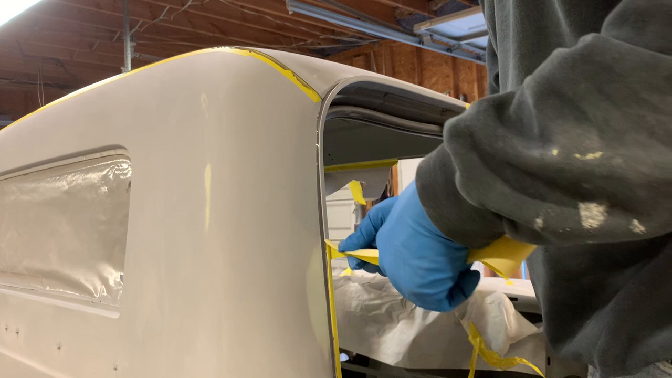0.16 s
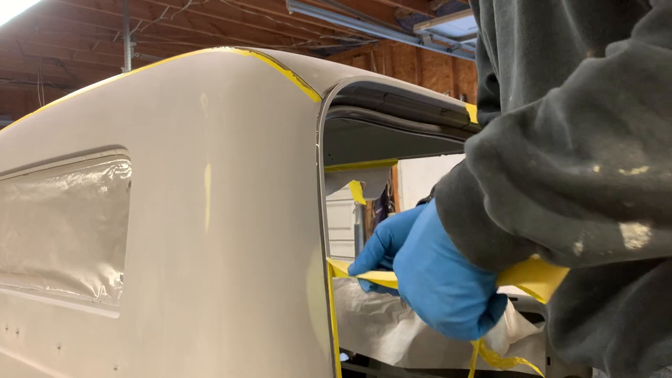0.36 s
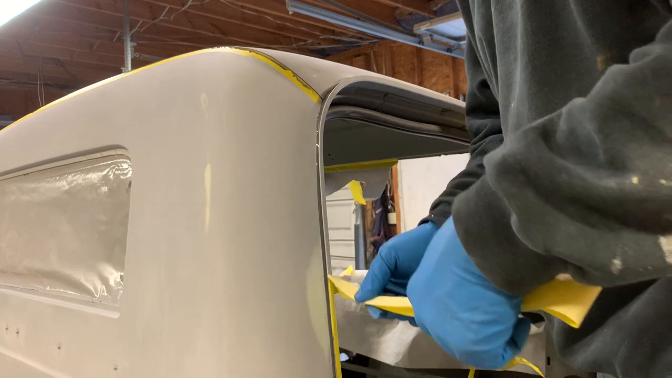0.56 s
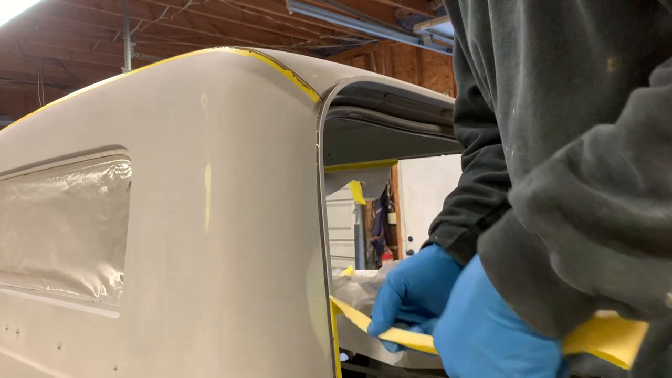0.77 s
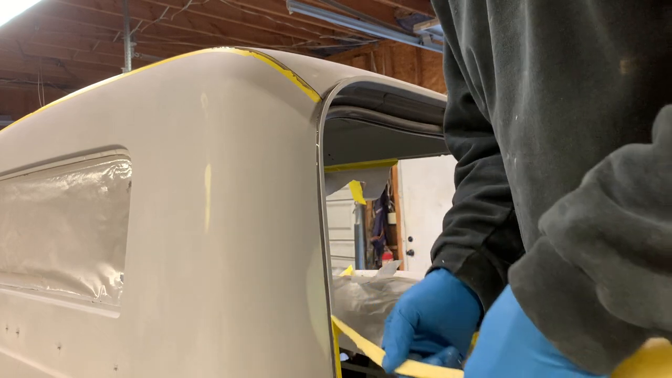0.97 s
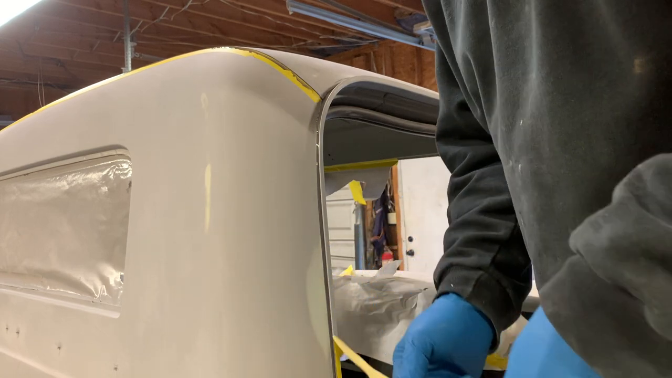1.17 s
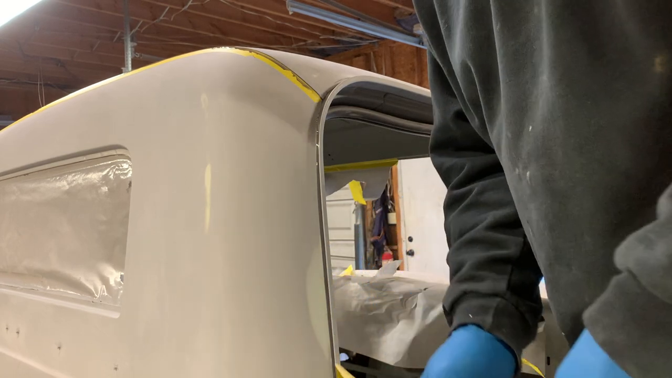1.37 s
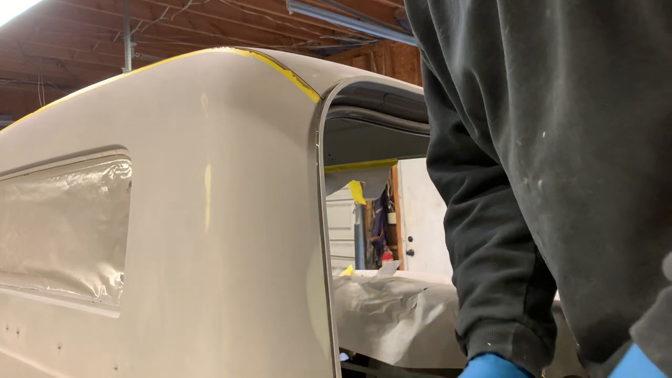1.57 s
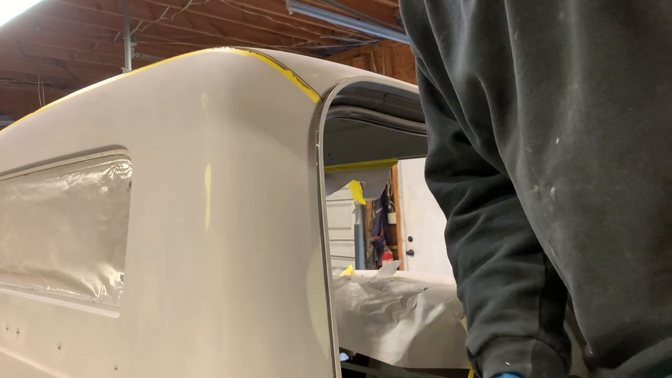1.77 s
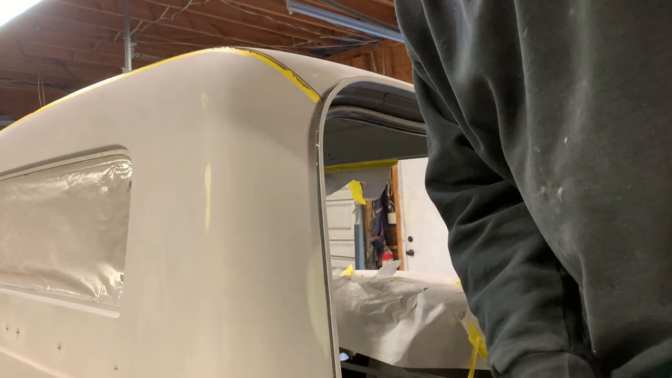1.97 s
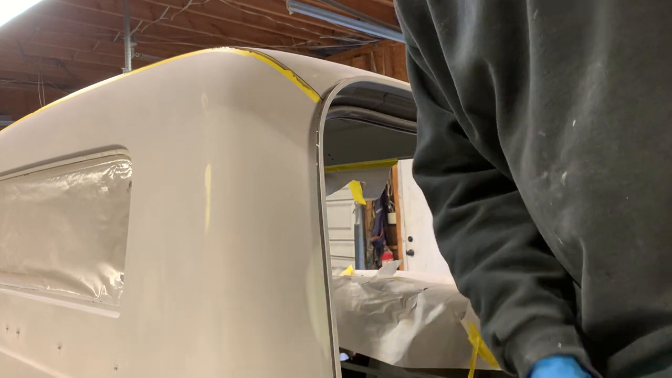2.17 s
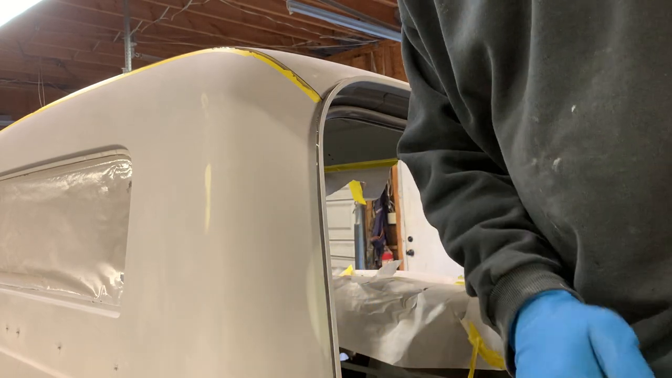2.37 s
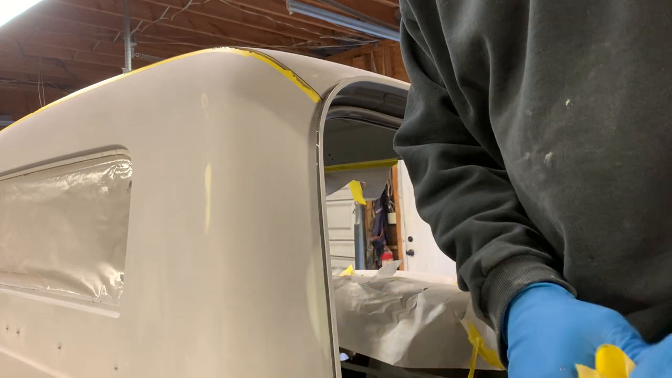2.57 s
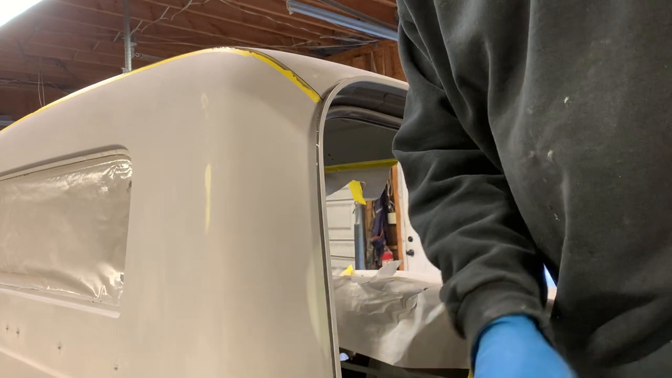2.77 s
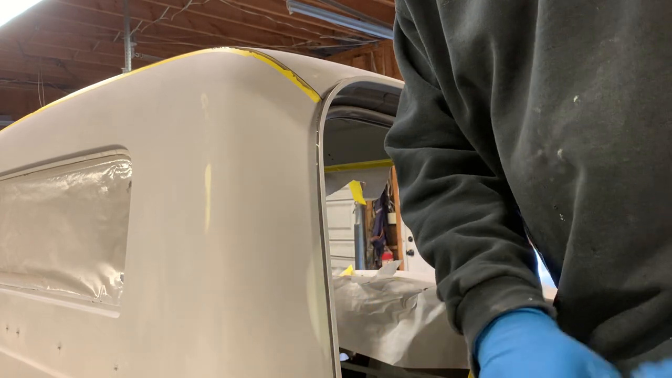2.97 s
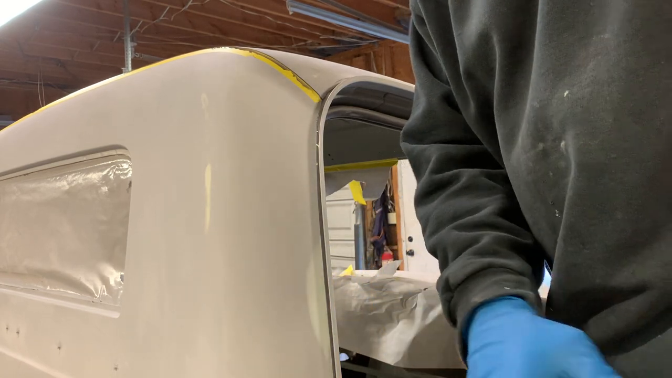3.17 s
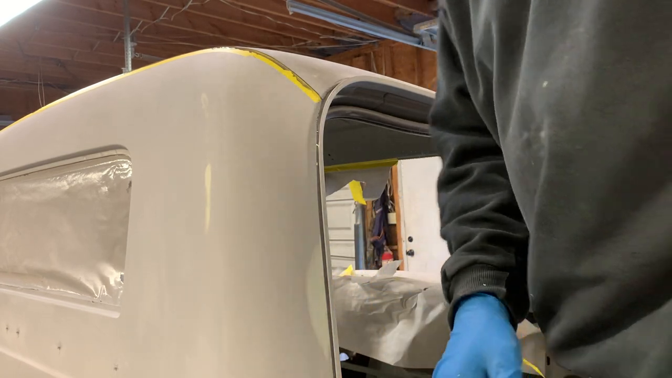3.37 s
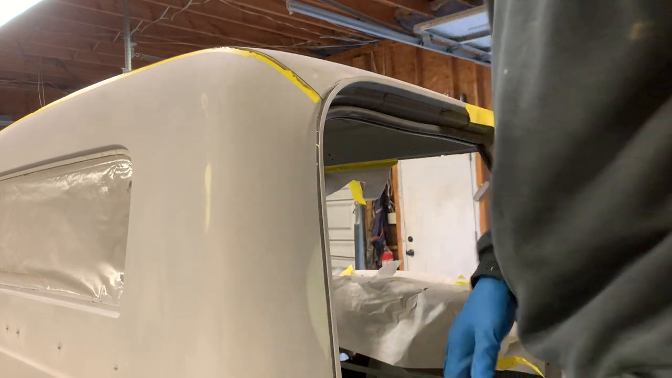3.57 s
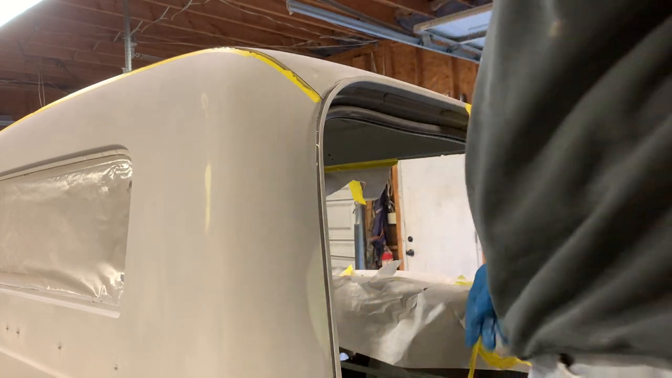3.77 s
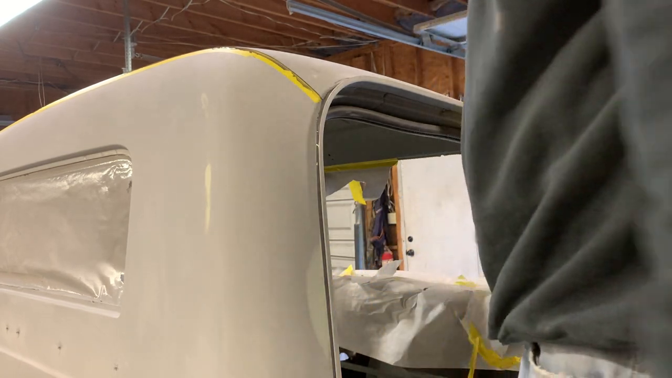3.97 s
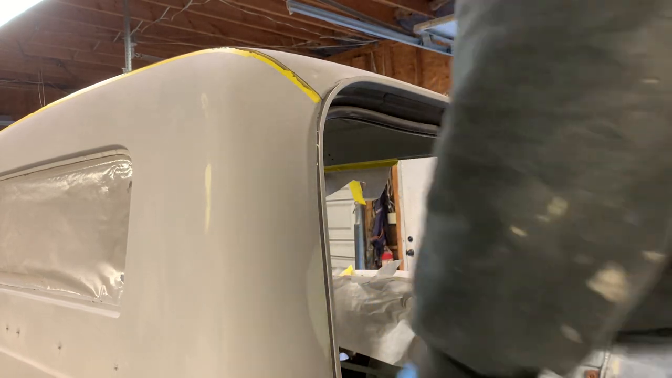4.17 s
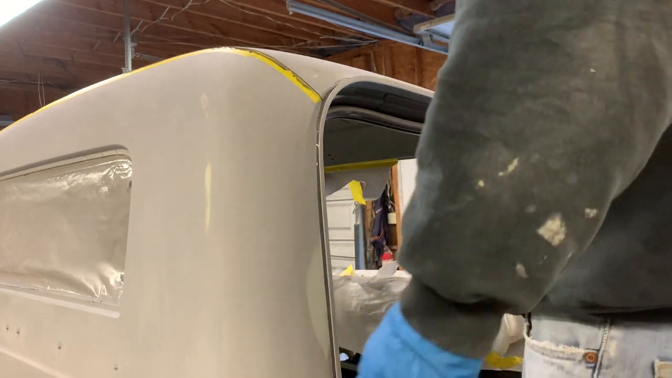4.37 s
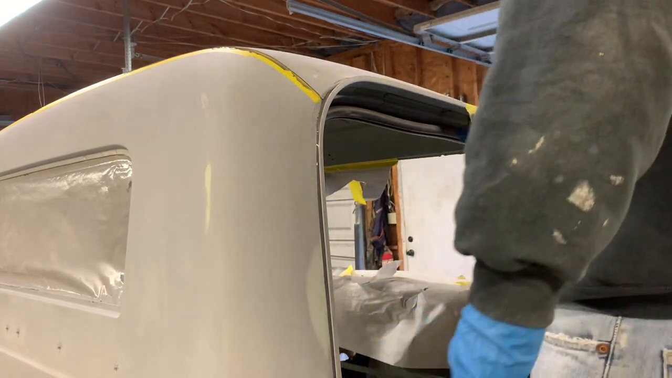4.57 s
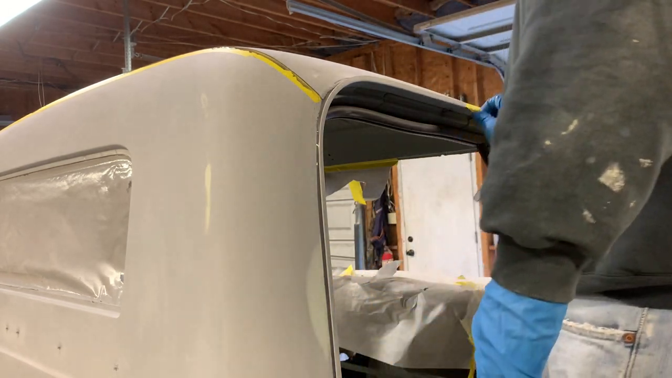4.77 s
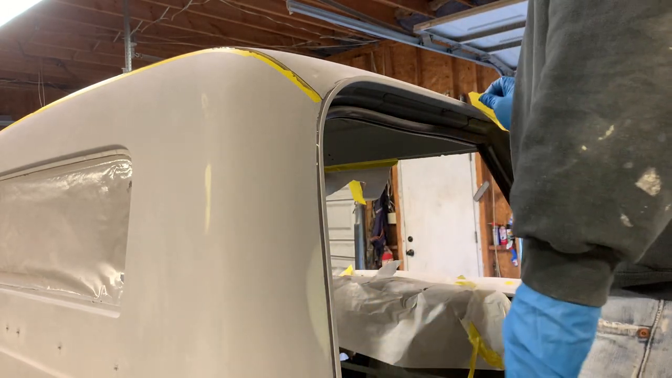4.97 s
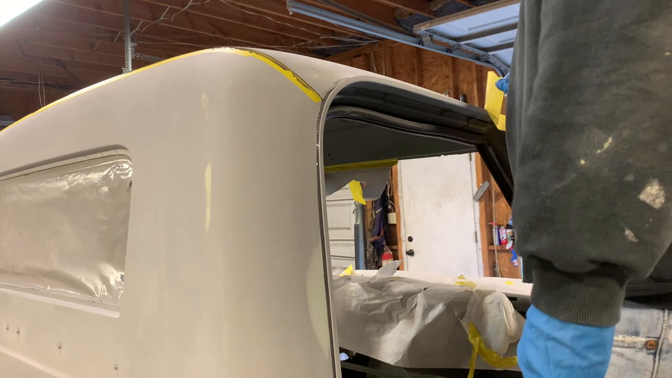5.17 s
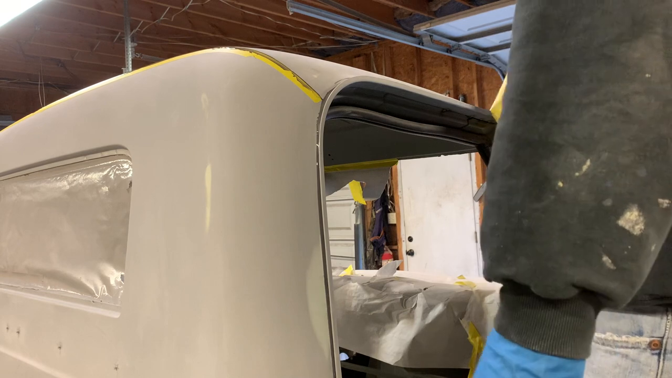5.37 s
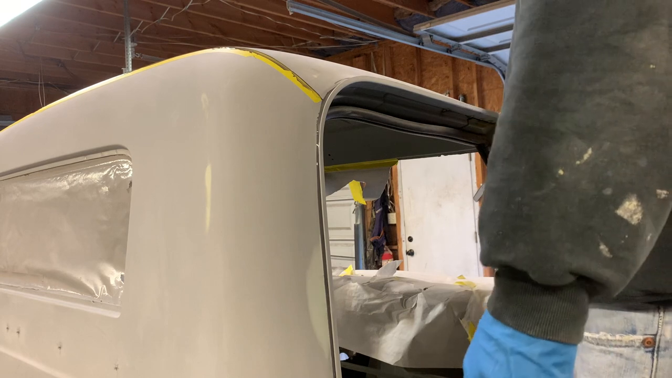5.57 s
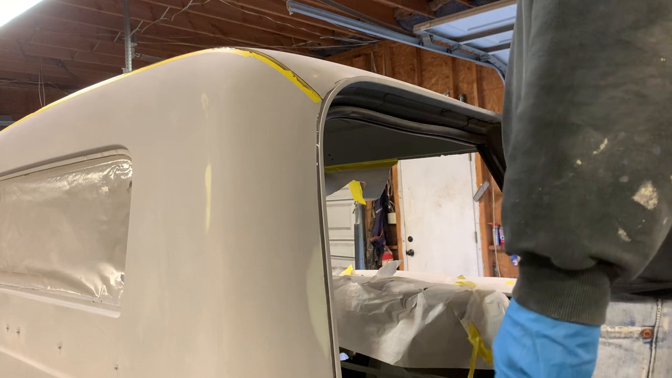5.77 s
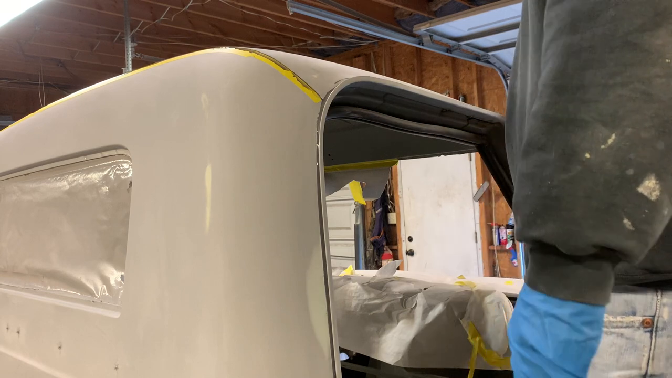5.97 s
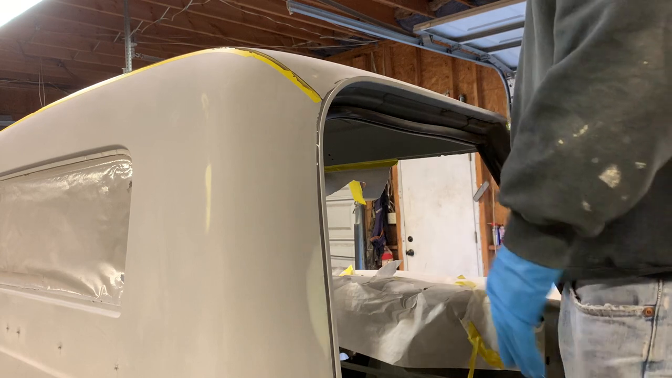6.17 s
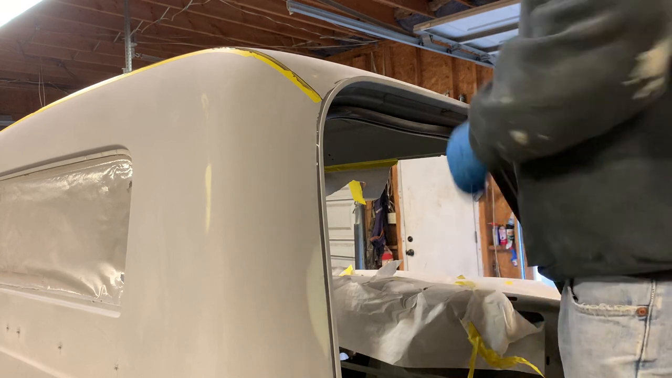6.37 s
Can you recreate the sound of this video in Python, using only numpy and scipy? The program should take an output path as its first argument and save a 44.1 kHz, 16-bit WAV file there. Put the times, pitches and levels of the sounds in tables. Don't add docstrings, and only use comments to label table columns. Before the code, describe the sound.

Two seconds of sizzling tape peel end in a loud snap, followed by crisp crumpling, glove rubbing and a final knock on ringing sheet metal.

```python
import sys
import numpy as np
from scipy import signal
from scipy.fft import rfft, irfft, next_fast_len
from scipy.io import wavfile
from scipy.ndimage import uniform_filter1d

SR = 44100
rng = np.random.default_rng(int(sys.argv[2]) if len(sys.argv) > 2 else 0)


def to_linear_factor(level_db):
    exponent = np.asarray(level_db, float) / 20
    return 10 ** exponent


def int16_out(signal):
    q = np.round(np.clip(np.atleast_2d(signal).T, -1, 1) * 32767)
    wavfile.write(sys.argv[1], SR, q.astype(np.int16))


N = 283563
FAST = next_fast_len(N)


def evened(x):
    return x / np.sqrt(np.mean(x ** 2) + 1e-20)


def smooth_noise(shape, width):
    return evened(uniform_filter1d(rng.standard_normal(shape), width))


def read(points, hz):
    f, value = np.transpose(points)
    return np.interp(np.log(hz + 1), np.log(f + 1), value)


def curves(rows):
    s, *columns = np.transpose(rows)
    return [np.interp(np.arange(N) / SR, s, c) for c in columns]


def band(x, lo_hz, hi_hz):
    sos = signal.butter(2, [lo_hz, min(hi_hz, SR / 2.1)], "band", fs=SR, output="sos")
    return signal.sosfilt(sos, x)


def coloured(x, points):
    gain = to_linear_factor(read(points, np.fft.rfftfreq(FAST, 1 / SR)))
    return irfft(rfft(x, FAST) * gain, FAST)[..., :N]


# (pitch_hz, level_db)
RUSTLE_COLOUR = [(300, 5), (480, 13), (1000, 9), (2000, 6.5), (3600, 10), (5500, 8.5), (8500, 16),
                 (12000, 17.5), (15000, 13.5), (16500, -21)]
# (time_s, pull_db, brightness_db)
PULL_CURVE = [(0.0, -53, 14), (0.29, -54, 12), (0.52, -54.5, 7), (0.9, -56, 9.5), (1.11, -55.5, 8.5),
              (1.5, -54, 5), (1.8, -52.5, 1.5), (1.9, -64.5, -14), (2.13, -68.5, 16)]


def rustle():
    crackle_db, pull_spread_db, stroke_spread_db = -1.5, 2.5, 5
    pull_db, bright_db = curves(PULL_CURVE)
    pulling = np.arange(N) < PULL_CURVE[-1][0] * SR
    pull_levels = to_linear_factor([pull_db, pull_db + crackle_db, pull_db + bright_db])
    power = strokes() + pulling * pull_levels ** 2

    spread_db = np.where(pulling, pull_spread_db, stroke_spread_db)
    size_db = spread_db * (np.minimum(rng.exponential(1, N), 3.5) + 0.98 * smooth_noise(N, 200))
    happens = rng.random(N) < 9000 / SR
    slips = to_linear_factor(size_db) * rng.standard_normal(N) * happens
    slips /= np.sqrt(uniform_filter1d(slips ** 2, 4000))

    z, hz = rfft(coloured(slips, RUSTLE_COLOUR), FAST), np.fft.rfftfreq(FAST, 1 / SR)
    low, mid = (1 / (1 + (hz / edge_hz) ** 4) for edge_hz in (1800, 7000))
    body_crackle_hiss = [evened(irfft(z * share, FAST)[:N]) for share in (low, mid - low, 1 - mid)]
    patches = to_linear_factor(1.5 * smooth_noise((3, N), 2500))
    return (np.sqrt(power) * patches * body_crackle_hiss).sum(axis=0) + strip(slips)


# (time_s, pitch_hz, level_db)
STRIP_SONG = [(0.0, 2290, -56), (0.266, 2850, -94), (0.52, 2130, -64), (0.704, 2150, -62),
              (0.854, 3930, -61), (1.128, 3320, -61.5), (1.3, 5000, -91), (1.45, 7000, -57),
              (1.8, 6600, -67)]


def strip(slips):
    hz, db = curves(STRIP_SONG)
    turn = np.exp(2j * np.pi * np.cumsum(hz) / SR)
    r = np.exp(-np.pi * 1500 / SR)
    ring = (turn * signal.lfilter([1], [1, -2 * r, r * r], slips / turn)).real
    return to_linear_factor(db) * evened(ring) * (np.arange(N) < STRIP_SONG[-1][0] * SR)


def modes(table):
    f = np.fft.rfftfreq(FAST, 1 / SR)
    power = sum(to_linear_factor(2 * db) / width / (1 + ((f - hz) / width * 1.25) ** 2) ** 2 for hz, width, db in table)
    gain = np.sqrt(power) * f ** 4 / (f ** 4 + 46 ** 4)
    both, apart = irfft(rfft(rng.standard_normal((2, FAST))) * gain, FAST)[:, :N]
    steady = np.sqrt(uniform_filter1d(both ** 2, 6000) + 1e-20)
    return evened(np.array([both + .17 * apart, both - .17 * apart]) / steady)


# (pitch_hz, width_hz, level_db)
LOW_RESONANCES = [
    [(59, 9.7, 8), (54.7, 33, -15)],
    [(83.54, 1.7, -1.5), (89, 62, -5.5)],
    [(132.6, 104, -0.5), (150.4, 0.83, -1.5), (179, 30, 2), (218.7, 5, -3.5)],
    [(246.4, 4.2, 6), (282, 54, 5), (340, 17, -4.5), (368, 140, 4.5)],
]
# (time_s, level_db)
DEEP_MACHINE = [(0.0, -59), (0.11, -51.5), (1.0, -50), (1.8, -47), (2.2, -53.5), (2.4, -48), (2.83, -48.5),
                (2.94, -56), (3.12, -45), (3.33, -62), (5.26, -69), (5.9, -66), (6.2, -50), (6.43, -60)]
# (time_s, level_db)
FAR_MOTOR = [(0.0, -69), (0.4, -52), (0.97, -53), (1.25, -35.5), (1.4, -49.5), (1.7, -49), (1.9, -45),
             (2.2, -71), (2.69, -47), (2.95, -60), (3.13, -57), (3.67, -65.5), (4.1, -50), (4.4, -63.5),
             (5.1, -62), (5.8, -45), (6.2, -51.5), (6.43, -58)]
# (time_s, level_db)
HAND_PRESS = [(0.0, -55), (0.4, -47.5), (1.83, -54.5), (2.27, -63), (2.5, -48.5), (2.58, -64), (2.68, -48),
              (2.95, -76), (3.11, -46.5), (3.67, -62.5), (4.2, -60.5), (4.8, -70), (4.89, -54), (5.1, -48),
              (5.33, -56), (5.55, -47.5), (5.92, -48), (6.43, -73)]
# (time_s, extra_db)
TAPE_TAUT = [(0, 4.5), (0.9, 7), (1.9, 14), (2.25, 2), (3.2, -4.5)]


def rumble():
    thump_s, thump_db, thump_width_s = 4.203, 24, .02
    t = np.arange(N) / SR
    press_db, taut_db = curves(HAND_PRESS)[0], curves(TAPE_TAUT)[0]
    drum_db = press_db + taut_db + thump_db * np.exp(-((t - thump_s) / thump_width_s) ** 2)
    levels_db = np.array(curves(DEEP_MACHINE) + curves(FAR_MOTOR) + [drum_db, press_db])

    lumps = evened(uniform_filter1d(smooth_noise((5, N), 3000), 3000))
    levels_db = levels_db + 2.0 * lumps[1:] + 1.5 * lumps[0]
    return sum(to_linear_factor(db) * modes(table) for db, table in zip(levels_db, LOW_RESONANCES))


# (time_s, level_db)
LAMP_BUZZ = [(0.0, -68), (0.36, -66), (0.79, -69), (1.41, -54), (2.67, -55.5), (2.92, -81), (3.1, -55),
             (3.49, -53), (3.74, -73), (4.21, -61.5), (4.58, -87), (4.91, -106), (5.1, -53.5), (5.84, -68),
             (6.32, -55.5), (6.43, -103)]


def buzz():
    hz = 334 + 2.5 * smooth_noise(N, 9000)
    return to_linear_factor(curves(LAMP_BUZZ)[0]) * np.sin(2 * np.pi * np.cumsum(hz) / SR)


# (pitch_hz, level_db per Hz)
FLOOR_COLOUR = [(200, 2), (350, 3.5), (1000, 2.5), (2500, -1.5), (6000, -6.5), (11000, -8.5),
                (16000, -15.5)]


def noise_floor():
    floor = to_linear_factor(-62) * evened(coloured(rng.standard_normal((2, N)), FLOOR_COLOUR))
    return floor * to_linear_factor(1.2 * smooth_noise(N, 5000))


def bodied(rows, body_db):
    return [(s, db, hz, t60, body_db - 13.5 * np.log2(hz / 2000), hiss_db)
            for s, db, hz, t60, hiss_db in rows]


def bursts(rows, spread, rise_s, size, snap, hold_s, drag_db, wide_db):
    out, t = np.zeros(N + size), np.arange(size) / SR
    drag = to_linear_factor(drag_db - 60 * t / 0.24)
    lumps = np.repeat(rng.exponential(1, (len(rows), size // 64)), 64, axis=1)
    noise = rng.standard_normal((len(rows), size)) * to_linear_factor(3.4 * np.minimum(lumps, 3))
    for (s, db, hz, t60, body_db, hiss_db), z in zip(rows, noise):
        dying = to_linear_factor(-60 * np.maximum(t - hold_s, 0) / np.clip(t60, .002, .3))
        burst = z * (dying + drag) * (1 - np.exp(-t / rise_s))
        burst[36] += snap
        parts = [band(burst, hz / spread, hz * spread),
                 band(burst, 1200, np.clip(2.2 * hz, 4500, 7000)),
                 band(burst, 600, 1300),
                 band(burst, 6500, 14000)]
        levels = to_linear_factor([-4, wide_db, body_db, hiss_db])
        mixed = sum(g * p / abs(p).max() for g, p in zip(levels, parts))
        out[round(s * SR):][:size] += to_linear_factor(db) * mixed
    return out[:N]


# (start_s, peak_db, pitch_hz, hiss_db above peak)
PEEL_CRACKS = [(0.2767, -32.5, 1960, 4), (1.121, -17.5, 4560, 2), (1.6153, 0, 6900, -14),
               (1.6149, -14, 1440, -30), (1.795, -13.5, 3570, 5.5), (1.8205, -13, 5300, -3),
               (1.962, -37.5, 2190, 11), (1.9928, -43, 3040, 16.5), (2.039, -41, 3130, 7),
               (2.0766, -7.5, 4950, -9), (2.1752, -34, 7500, 2), (2.218, -29, 4160, -18),
               (2.2602, -34, 3370, -17), (2.357, -33.5, 2240, -8)]
# (start_s, peak_db, pitch_hz, hiss_db above peak)
BALL_CRACKS = [(2.394, -20.5, 1480, -13), (2.4067, -25.5, 1700, -12.5), (2.423, -18, 2230, 7),
               (2.471, -2.5, 3070, -10), (2.4736, -9.5, 6900, -5.5), (2.4773, -10, 3930, 2),
               (2.4907, 2.5, 5560, -18.5), (2.4966, -29.5, 2000, 2), (2.5144, -18, 1700, -9),
               (2.5814, -15, 1590, -5), (2.667, -21, 1900, -11), (2.6878, 7, 3550, -14),
               (2.695, -20, 3550, -17), (2.703, -23, 1900, -3), (2.7454, -3, 6300, -8),
               (2.762, -20, 3440, -1.5), (2.7705, 0, 2200, -8), (2.771, -7, 6200, -6)]
# (start_s, peak_db, pitch_hz, hiss_db above peak)
LATE_CRACKS = [(3.0242, -22, 3960, -12), (3.039, -20, 1600, -13), (3.0659, -12.5, 7000, -3),
               (3.0816, -10.5, 6030, -8), (3.084, -12.5, 6060, -12), (3.096, -8, 1850, -4),
               (3.1116, -12.5, 1880, -1), (3.1482, -15, 6500, 3), (3.165, -8, 2360, -20.5),
               (3.236, -34.5, 4190, -14.5), (3.2588, -4, 2700, -6), (3.273, -25, 3370, 6),
               (3.3392, -34, 4100, -11), (3.4146, -24, 4220, -7), (3.4316, -20, 4400, -9),
               (3.7138, -17.5, 5040, -14), (3.947, -41.5, 1290, -9.5), (4.097, -21, 2070, -26),
               (4.8616, -33, 1610, -12), (5.1093, -23, 1670, -28), (5.3487, -33, 3380, -26),
               (5.6937, -28, 1664, -38), (5.771, -19, 2740, 5.5)]
# (start_s, peak_db, pitch_hz, hiss_db above peak)
MORE_CRACKS = [(1.8093, -16, 4030, 1), (1.9405, -43, 3600, 11), (1.9988, -42, 6000, 8),
               (2.0425, -35, 3270, -9), (2.059, -28, 3100, -7), (2.0831, -26, 3700, -1),
               (2.1909, -34, 4070, -13), (2.3074, -33.5, 4050, -13.5), (2.4284, -10.5, 3440, -8),
               (2.431, -20.5, 2500, -7), (2.5127, -23.5, 1150, 11), (2.519, -35, 1500, -11),
               (2.6172, -36.5, 4000, -6.5), (2.623, -19.5, 3560, -3), (2.6712, -18, 1880, -10),
               (2.677, -27, 800, -23), (2.7405, -33, 6000, 5), (2.753, -24.5, 6500, -8),
               (3.0322, -26, 4050, -9), (3.071, -28.5, 6960, -11.5), (3.1145, -13, 1300, -4),
               (3.2483, -21, 2410, -9), (3.2655, -14, 3000, -12), (3.3784, -19, 1620, -14),
               (3.41, -35.5, 5540, -9), (3.7066, -28, 3190, -11), (4.0328, -24, 1970, 11),
               (4.8714, -27.5, 1500, 2), (5.1372, -30, 1980, -20), (5.2209, -38, 1220, -14.5),
               (5.6838, -28, 1450, -14), (5.6967, -23, 1800, -5.5), (5.7747, -18.5, 2100, -12),
               (6.3608, -45, 1120, -34), (6.3795, -44, 1120, -16)]


def cracks():
    rows = [(s, db, hz, .006 - .0002 * db, hiss_db)
            for s, db, hz, hiss_db in PEEL_CRACKS + BALL_CRACKS + LATE_CRACKS + MORE_CRACKS]
    return bursts(bodied(rows, -16.5), spread=1.45, rise_s=.001, size=640, snap=10,
                  hold_s=0, drag_db=-99, wide_db=-10)


def long_bursts(rows):
    return bursts(rows, spread=2.1, rise_s=0.00068, size=8192, snap=0,
                  hold_s=0.0051, drag_db=-11.5, wide_db=-7)


# (start_s, peak_db, pitch_hz, fade_s by 60 dB, hiss_db above peak)
FIRST_RIPS = [(1.433, -16.5, 4830, 0.039, 8), (1.795, -21.5, 3800, 0.0097, 1),
              (2.0757, -28, 4770, 0.028, -41.5), (2.4225, -27, 2150, 0.026, -7.5),
              (2.499, -25.5, 2200, 0.052, 4), (2.5825, -27.5, 1730, 0.025, -4),
              (2.7457, -37.5, 2040, 0.03, 19), (2.9166, -8, 4620, 0.0067, -8.5),
              (3.0612, -26.5, 1950, 0.15, 4), (3.1057, -14, 2010, 0.037, -36),
              (3.2581, -24.5, 2760, 0.012, -33), (3.374, -29, 4060, 0.01, 6), (3.4635, -33, 4500, 0.03, 3)]
# (start_s, peak_db, pitch_hz, fade_s by 60 dB, hiss_db above
MORE_RIPS = [(3.712, -35.5, 4730, 0.05, -14), (4.032, -22.5, 3600, 0.4, -21), (4.192, -34.5, 2080, 0.05, -1),
             (4.7169, -15.5, 4800, 0.038, -4.5), (4.8655, -37, 1550, 0.028, 1.5),
             (4.93, -36.5, 1510, 0.036, 3.5), (5.0615, -33.5, 2040, 0.065, 6), (5.4577, -38, 1540, 0.19, 3),
             (5.6863, -31, 1490, 0.41, -31.5), (5.771, -24, 2540, 0.35, 3.5), (5.979, -19, 4230, 0.03, 1),
             (6.1145, -26, 2260, 0.021, -21), (6.2154, -23, 2560, 0.017, -2)]


def rips():
    return long_bursts(bodied(FIRST_RIPS + MORE_RIPS, -27))


# (start_s, peak_db, pitch_hz, fade_s by 60 dB, hiss_db above peak)
SQUEEZE_RUNS = [(2.4715, -16, 1050, 0.0073, -20), (2.5135, -30, 1100, 0.013, -4),
                (2.612, -25.5, 1900, 0.036, -3.5), (2.689, -23.5, 3320, 0.0095, 9),
                (2.772, -26, 2300, 0.03, -22), (3.078, -29, 2200, 0.025, 1),
                (3.116, -24.5, 890, 0.045, -20), (3.464, -27, 1670, 0.036, -20),
                (2.9165, -23.5, 1300, 0.02, -20), (2.598, -27, 1700, 0.033, -3),
                (2.621, -30, 2220, 0.02, -8), (1.436, -19, 7500, 0.01, -18.5),
                (3.259, -28.5, 4800, 0.012, -17), (5.09, -40, 700, 0.08, -30), (3.129, -30, 2200, 0.018, 4),
                (3.408, -28, 6000, 0.024, -13), (3.429, -24, 5500, 0.015, -2),
                (4.042, -29, 4300, 0.02, -18), (4.056, -33, 3480, 0.03, -12), (4.711, -42, 4500, 0.02, -8),
                (5.691, -36, 2500, 0.02, -3.5), (5.842, -26, 3470, 0.13, 1)]


def squeezes():
    return bursts(bodied(SQUEEZE_RUNS, -27), spread=1.68, rise_s=0.003, size=4096, snap=0,
                  hold_s=0.006, drag_db=-30.5, wide_db=-7)


# (start_s, hold_s, body_db, crispness_db)
GLOVE_STROKES = [(2.15, 0.22, -72.5, 9.5), (2.409, 0.094, -51.5, 3.5), (2.582, 0.019, -51, 6),
                 (2.657, 0.041, -49.5, 8), (2.84, 0.12, -69, 13), (2.914, 0.12, -61.5, 11),
                 (4.033, 0.003, -52, 7), (1.951, 0.12, -76, 15.5), (5.821, 0.0074, -50, 12),
                 (3.701, 0.012, -69.5, 10), (3.068, 0.043, -46.5, 5), (3.213, 0.067, -56, 4.5),
                 (3.37, 0.1, -63, 10), (4.057, 0.055, -51, -33), (4.2, 0.0062, -51.5, -14),
                 (4.352, 0.01, -71, 5.5), (4.722, 0.072, -61.5, 5.5), (4.862, 0.03, -53.5, -3),
                 (4.92, 0.13, -59, -2), (5.065, 0.041, -48, -1), (5.2, 0.29, -59.5, -4.5),
                 (5.472, 0.093, -52, -1.5), (5.649, 0.16, -58, 5), (5.813, 0.016, -57.5, 17),
                 (5.92, 0.16, -77, 11), (6.11, 0.11, -66, -12), (6.219, 0.024, -47.5, -8)]


def strokes():
    rise_s, fall_db_per_s = 0.02, 159
    t, power = np.arange(0, N, 64) / SR, 1e-12
    for start, hold, db, crisp_db in GLOVE_STROKES:
        rise = np.clip((t - start) / rise_s + 1, 0, 1)
        shape = rise * to_linear_factor(db - fall_db_per_s * np.maximum(t - start - hold, 0))
        body_crackle_hiss = to_linear_factor([[0], [crisp_db], [-4.5 + 0.64 * crisp_db]])
        power = power + (shape * body_crackle_hiss) ** 2
    return np.array([np.interp(np.arange(N) / SR, t, p) for p in power])


# (start_s, peak_db, pitch_hz, fade_s by 60 dB, body_db, hiss_db above peak)
BALL_KNOCKS = [
    (2.768, -29.5, 689, 0.035, -20, -24.5),
    (4.031, -17.5, 1490, 0.016, -24, -53),
    (6.215, -14.5, 1500, 0.016, -6, -32),
]


def knocks():
    return long_bursts(BALL_KNOCKS)


# (start_s, level_db, pitch_hz, length_s)
GLOVE_CREAKS = [
    (4.385, -66, 1600, 0.21),
    (5.2, -59, 2600, 0.047),
    (3, -59, 3000, 0.04),
    (3.72, -59, 3000, 0.056),
    (6.23, -53.5, 1130, 0.36),
]


def creaks():
    size = SR // 2
    out = np.zeros(N + SR)
    for (s, db, hz, length), z in zip(GLOVE_CREAKS, rng.standard_normal((len(GLOVE_CREAKS), size))):
        u = np.arange(size) / SR / length
        narrow = band(band(z, hz / 1.3, hz * 1.01), hz / 1.17, hz * 1.37)
        out[round(s * SR):][:size] += to_linear_factor(db - 31 * u) * np.minimum(u / 0.058, 1) * evened(narrow)
    return out[:N]


# (pitch_hz, level_db, fade_s by 60 dB)
PANEL_TONES = [(674, -8, 0.09), (838, -15, 0.074), (1007, -6, 0.05), (1120, 0.5, 0.054),
               (1228, -9.5, 0.056), (1510, -17, 0.069), (1930, -8, 0.05), (2080, -17, 0.05),
               (2900, -20, 0.03)]
# (start_s, level_db)
PANEL_RINGS = [
    (6.2158, -23),
    (4.0325, -38),
]


def rings():
    out, t = np.zeros(N + SR), np.arange(SR // 4) / SR
    ring = sum(to_linear_factor(db - 60 * t / t60) * np.sin(2 * np.pi * hz * t) for hz, db, t60 in PANEL_TONES)
    for s, db in PANEL_RINGS:
        out[round(s * SR):][:len(t)] += to_linear_factor(db) * ring * (1 - np.exp(-t / 0.00031))
    return out[:N]


# (pitch_hz, fade_s by 60 dB)
SHOP_ECHO = [(250, 0.11), (700, 0.12), (1800, 0.21), (4600, 0.17), (12000, 0.057)]


def shop(x):
    taps = np.zeros((2, SR // 2))
    at = np.arange(100, SR // 2 - 20, 20) + rng.integers(0, 20, (2, (SR // 2 - 101) // 20))
    np.put_along_axis(taps, at, rng.choice([-1., 1.], at.shape), 1)
    hz, t, z = signal.stft(taps, SR, nperseg=256)
    fade = to_linear_factor(-60 * t / read(SHOP_ECHO, hz)[:, None])
    tail = signal.istft(z * fade, SR, nperseg=256)[1]
    return signal.fftconvolve(x[None], tail / np.linalg.norm(tail[0]), axes=1)[:, :N]


# (time_s, left_delay_samples)
HAND_PLACE = [(0, -4.2), (0.6, -3.6), (1.9, -1.5), (2.02, 10), (2.33, 9), (2.38, 5), (2.65, 4.4),
              (2.85, 4.4), (2.9, 13), (3.03, 13), (3.036, 5), (3.3, 6), (3.33, 10), (3.7, 14), (3.9, 2.5),
              (4.8, 1), (5.9, 1), (5.96, 4.1)]


def ports(x):
    t = np.arange(N)
    return np.array([np.interp(t - curves(HAND_PLACE)[0], t, x), x])


def scene():
    rub = rustle() + creaks()
    crack = cracks()
    rip = rips() + knocks() + rings() + squeezes()
    sent = to_linear_factor(3.5) * rub + to_linear_factor(-5) * rip + to_linear_factor(-20) * crack
    turn = 9 * np.arange(N) / SR
    wet = shop(sent * np.cos(turn)) + shop(sent * np.sin(turn))
    return ports(to_linear_factor(-2.0) * rub + crack + rip) + wet + rumble() + buzz() + noise_floor()


def top_cut(x):
    return signal.sosfilt(signal.butter(12, 16470, fs=SR, output="sos"), x)


def record(dry):
    hz, z = np.fft.rfftfreq(FAST, 1 / SR), rfft(dry, FAST)
    top = .97 / (1 + (7900 / (hz + 1)) ** 9)
    shifted = z[1] * np.exp(1j * (1.38 - 2 * np.pi * hz * 14 / SR))
    left = np.sqrt(1 - top ** 2) * z[0] + top * shifted
    edge = 1 / (1 + (hz / 15400) ** 24)
    mix = np.clip(irfft(edge * np.array([left, z[1]]), FAST)[:, :N], -1, 1)
    return top_cut(mix)


dry = scene()
out = record(dry)
int16_out(out)
```